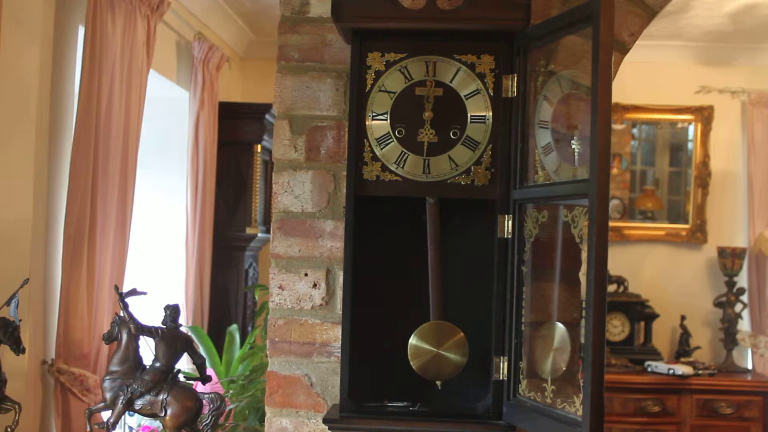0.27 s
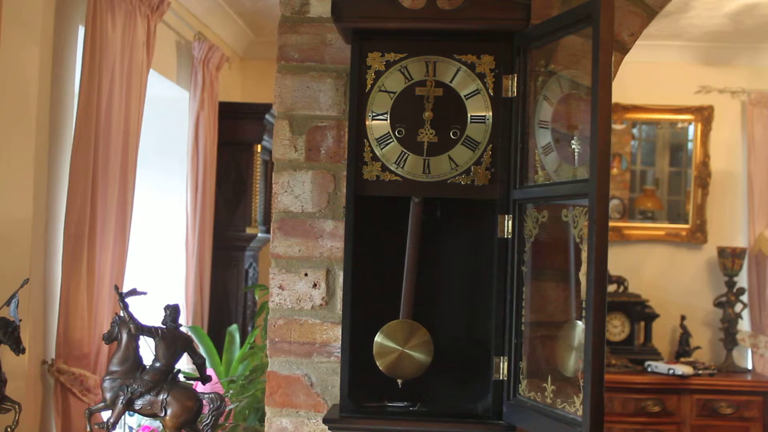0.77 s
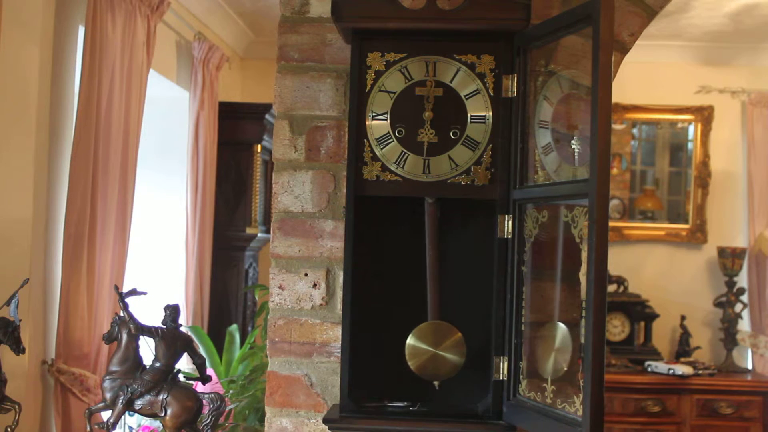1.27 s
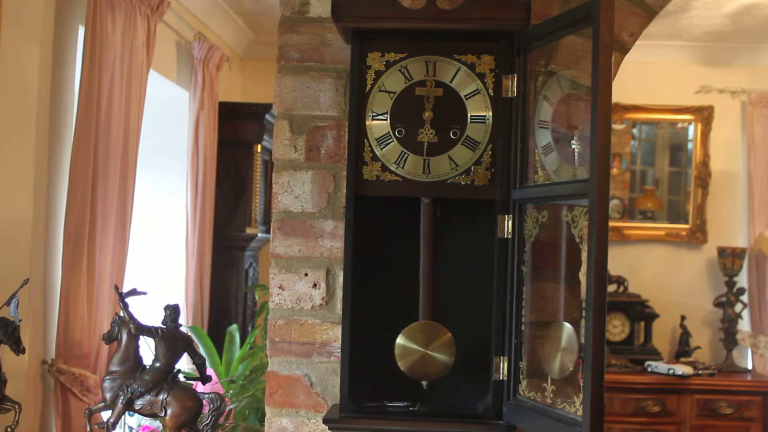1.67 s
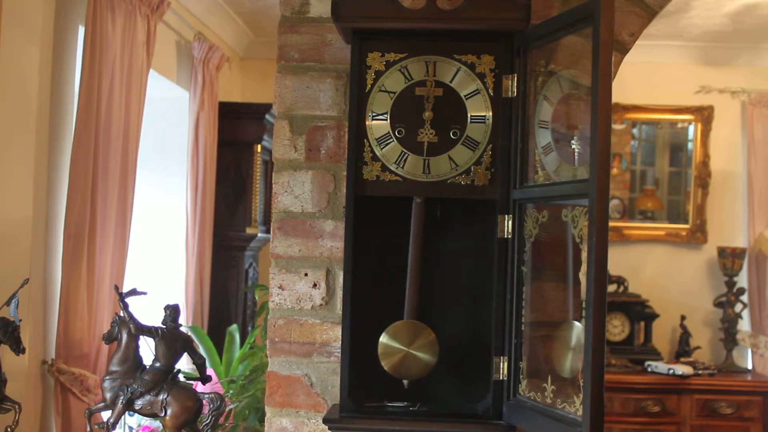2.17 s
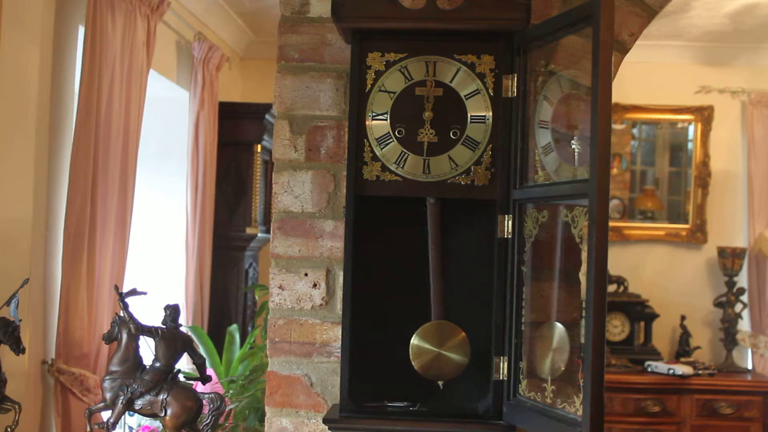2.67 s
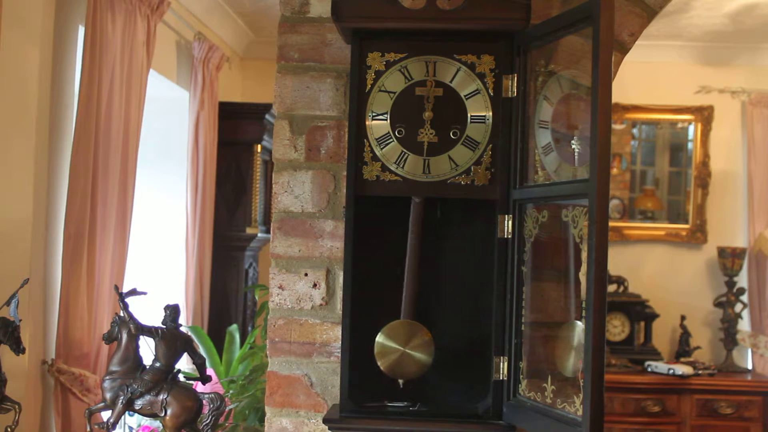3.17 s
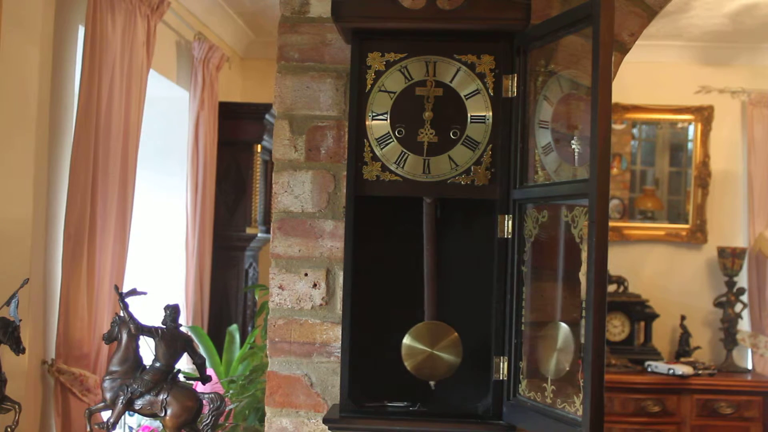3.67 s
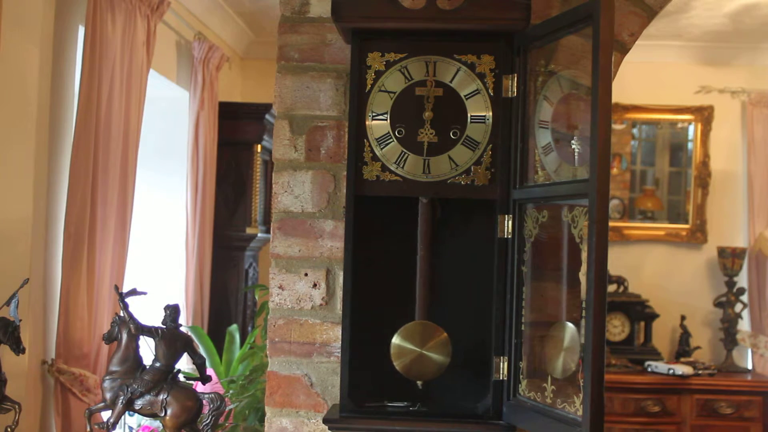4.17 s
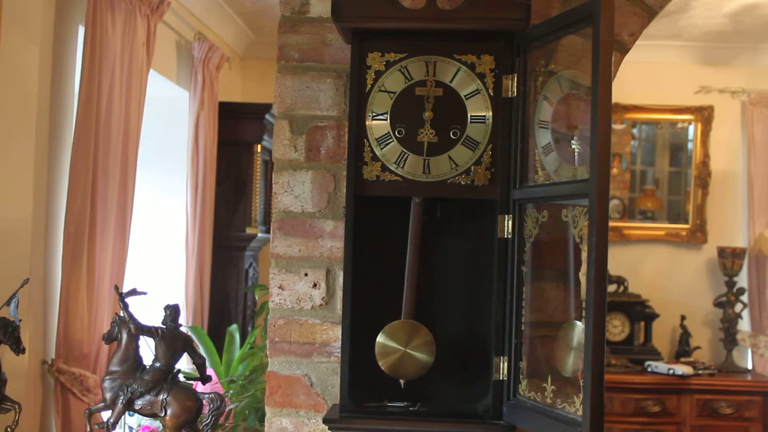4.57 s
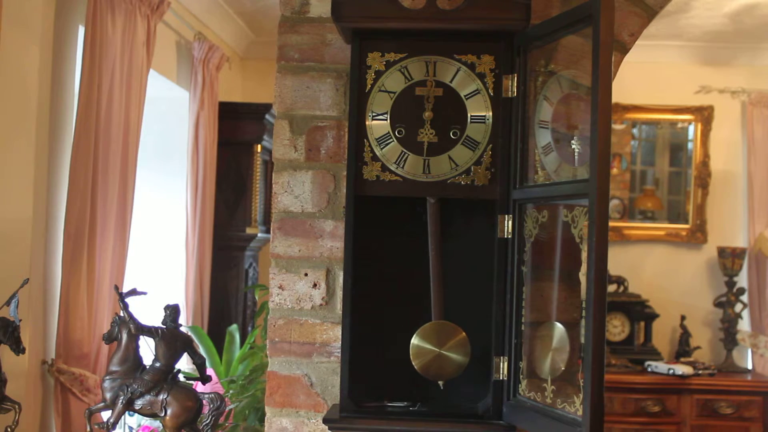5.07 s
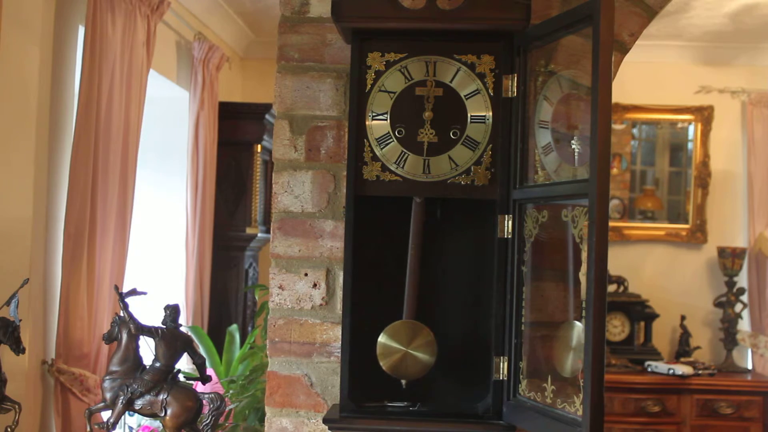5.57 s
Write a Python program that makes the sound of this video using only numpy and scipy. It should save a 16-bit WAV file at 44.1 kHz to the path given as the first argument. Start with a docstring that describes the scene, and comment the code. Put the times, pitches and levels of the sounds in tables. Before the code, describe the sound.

Close to an open pendulum wall clock in a quiet living room, a gong stroke is already ringing. Four more blows follow a little over a second apart, each a woody thud with a bright steely ping and long wavering ring. The hammer clacks back just after each one, a thin rattling whirr runs between strokes, and small clicks stop it. Faint room hum lies beneath.

```python
"""In a quiet living room a wall clock, its case door open, strikes the hour on a coiled wire gong.
Each hammer blow adds to the ring that is still there, so single partials swell or cancel from stroke to stroke.
Blows thud in the wooden case as damped modes and noise; the hammer clacks back on its rest.
Between strokes the fly of the strike train whirrs, a chopped noise, until lifting the hammer slows it.
The works click softly as short noise resonances, over faint air noise and a hum of steady sines."""
import sys
import numpy as np
from scipy import signal
from scipy.fft import rfft, irfft
from scipy.io import wavfile

SR = 44100
rng = np.random.default_rng(int(sys.argv[2]) if len(sys.argv) > 2 else 0)


def materialize(psi):
    """Save the field psi as 16-bit PCM at rate SR to the path in sys.argv[1].

    A 1-D psi becomes a single channel; in a 2-D psi each row is a channel.
    """
    bounded = np.clip(np.atleast_2d(psi).T, -1, 1)
    quanta = np.round(bounded * 32767).astype(np.int16)
    wavfile.write(sys.argv[1], SR, quanta)


N = 256220
T = np.arange(N) / SR  # seconds

# Air noise of the room. Each row: frequency in Hz, density in dB per Hz.
ROOM_AIR = [(25, -87), (70, -89), (130, -83), (330, -78), (1000, -83), (2200, -83), (4500, -89),
            (6500, -97), (10000, -96), (13000, -98), (15500, -103)]
# Steady hum in the room. Each row: frequency in Hz, rms level in dB.
ROOM_HUM = [(50, -72), (100, -62.5), (140, -65), (200, -60.5), (286, -59.5), (353, -58.5)]
# Hammer blows on the gong; the first falls before the sound opens, so only its ring is heard.
# Each row: time in seconds, strength in dB, brightness in dB per octave from 1 to 5 kHz.
STROKES = [ (-0.28889, -.5, 0), (0.997214, -.3, 0), (2.224, .1, .5), (3.469526, -1.4, -.1),
           (4.791204, .2, -.2), ]
# Bending modes of the coil.
# Each row: frequency in Hz, level in dB before family gain and blow strength, t60 in seconds.
BENDING_MODES = [(177.54, -54.4, 22.0), (227.2, -42.9, 19.6), (428.66, -37.8, 13.8), (509.7, -27.8, 8.7),
                 (596.66, -24.8, 6.1), (689.44, -32.5, 8.7), (787.0, -34.8, 6.1), (891.52, -31.5, 6.1),
                 (1001.04, -17.6, 6.1), (1114.98, -24.1, 9.7), (1236.32, -27.9, 6.1), (1360.42, -30.8, 5.4),
                 (1491.52, -26.2, 4.8), (1626.84, -32.7, 9.7), (1765.8, -47.6, 10.9), (1908.64, -38.2, 5.4),
                 (2052.9, -41.1, 10.9), (2200.26, -35.6, 10.9), (2348.18, -39.2, 6.9),
                 (2499.12, -35.7, 6.9), (2655.82, -36.7, 7.7), (2819.36, -40.6, 6.9), (2992.94, -39.6, 6.9),
                 (3171.92, -36.7, 4.8), (3359.56, -27.7, 3.0), (3553.04, -31.4, 2.1), (3751.0, -31.9, 2.7),
                 (3955.74, -33.5, 1.7)]
# Mostly weaker modes in the plane of the coil, most lying a little below a bending mode.
# Each row: frequency in Hz, level in dB before family gain and blow strength, t60 in seconds.
IN_PLANE_MODES = [(873.14, -48.2, 19.6), (980.9, -41.8, 8.7), (1093.48, -44.1, 17.4),
                  (1214.02, -45.7, 10.9), (1335.82, -36.9, 6.9), (1599.26, -45.0, 6.9),
                  (1736.38, -44.5, 4.8), (1876.3, -48.9, 10.9), (2017.52, -49.6, 6.9),
                  (2160.94, -49.8, 8.7), (2307.2, -37.8, 2.7), (2457.6, -34.2, 1.7), (2615.14, -43.4, 3.0),
                  (4124.44, -46.9, 4.3), (4783.32, -49.2, 4.8), (2786.14, -51.8, 5.4),
                  (2955.9, -56.9, 22.0), (3710.56, -47.7, 3.8), (3907.1, -50.0, 3.4), (5243.9, -51.6, 4.3),
                  (5722.48, -51.8, 3.0)]
# Short high modes that make the steely ping.
# Each row: frequency in Hz, level in dB before family gain and blow strength, t60 in seconds.
PING_MODES = [(4167.2,-22.5,1.8), (4382.4,-30,1.6), (4604.22,-30.5,.95), (4830.58,-33.5,1.1),
              (5059.9,-33.5,2), (5294.8,-43,2.3), (5534.7,-37,2.3), (5777.0,-51,2), (6022.38,-43,2.3),
              (6269.88,-46,2.6), (6764.38,-44.5,1.8), (8957,-56,1.6), (9265.34,-52.5,2.6), (10213.2,-51,.7),
              (10539.7,-44,.4), (10871,-55,.6), (11202,-54,.4), (11550.7,-53,1.8), (11886,-54,.8),
              (12233.2,-50,1), (12578,-49,.7), (12927,-54,.8), (13280,-48,1.2), (13638,-55,1.3),
              (13996,-53,1), (14362,-54,.8), (15105,-52,.7), (15493.3,-54,1.1)]
# Damped modes of the wooden case.
# Each row: frequency in Hz, level in dB before family gain and blow strength, t60 in seconds.
CASE_MODES = [(200,-42,.25), (470,-33,.14), (600,-32,.12), (880,-20,.09), (955,-25,.08), (1325,-20,.08),
              (1465,-27,.08)]
# Noise of a blow on the case. Each row: frequency in Hz, density in dB per Hz before the blow's envelope.
KNOCK_NOISE = [(80, -88), (200, -63), (450, -59), (900, -55), (1350, -55), (2000, -67), (4500, -69),
               (7500, -80), (11000, -85), (15000, -87)]
# Clack of the hammer on its rest. Each row: frequency in Hz, density in dB per Hz before its envelope.
REST_NOISE = [(80, -95), (200, -68), (500, -59), (1400, -53), (2500, -67), (4500, -72), (7000, -81),
              (9000, -79), (15000, -85)]
# The hammer falls back on its rest. Each row: time in seconds, relative level in dB, pitch in Hz.
REBOUNDS = [(1.066, 0, 1750), (2.285, 0, 2040), (3.547, 1.5, 2050), (4.878, -1, 1800)]
# Tone of the strike train's whirr. Each row: frequency in Hz, density in dB per Hz before the run level.
WHIRR_TONE = [(300, -47.5), (1000, -39), (2500, -36), (3600, -40.5), (4500, -35.5), (5600, -39),
              (6800, -46), (9000, -44), (12000, -41.5), (12950, -38), (13370, -23), (13750, -31),
              (14100, -41), (15600, -46)]
# Runs of the fly, one for each stroke. Each row: start in seconds, length in seconds,
# top gain in dB, final part spent lifting the hammer in seconds.
FLY_RUNS = [(-.28, .78, -40.5, .32), (.975, .755, -38.5, .34), (2.195, .655, -38, .22),
            (3.60, .52, -43.5, .22), (4.92, .52, -41.5, .13)]
# Light clicks of escapement and levers.
# Each row: time in seconds, starting level of the narrow ring in dB, pitch in Hz.
CLICKS = [(.66, -55, 13500), (.765, -53, 4600), (1.845, -53, 10500), (1.90, -51, 4500), (3.12, -53, 5300),
          (3.18, -54, 14200), (4.345, -52, 5200), (4.64, -53, 7300), (4.675, -55, 14200),
          (5.652, -48, 13200)]

FLY_HZ = 61.4  # mean turns per second, around which the speed drifts
SPIN_UP_S, SPEEDING_DB_PER_S = .04, 13  # the whirr sets in, then swells as the fly gathers speed
LOAD_DB, STOP_T60_S = 10, .3  # lifting the hammer drags the whirr down; then it dies away
CATCH_DB, CATCH_HZ = -50, 13400  # small click that ends each run
TOP_HZ = 15750


def undb(db):
    """Decibels to gain."""
    return 10 ** (np.asarray(db) / 20)


def fade(at, t60):
    """Exponential decay that starts at a given moment."""
    return (T >= at) * np.exp(-np.log(1000) * np.maximum(T - at, 0) / t60)


def colour(x, spectrum):
    """Give white sound of rms 1 a density in dB per Hz, drawn over log frequency."""
    hz, db = np.transpose(spectrum)
    bins = np.maximum(np.fft.rfftfreq(N, 1 / SR), 1)
    gain = undb(np.interp(np.log(bins), np.log(hz), db))
    return irfft(rfft(x) * gain, N) * np.sqrt(SR / 2)


def noise(spectrum):
    """Noise with the given density in dB per Hz."""
    return colour(rng.standard_normal(N), spectrum)


def resonance(hz, width_hz):
    """Noise in one resonance, rms 1."""
    centre_hz = min(hz, SR / 2 - width_hz)
    b, a = signal.iirpeak(centre_hz, hz / width_hz, fs=SR)
    y = signal.lfilter(b, a, rng.standard_normal(N))
    return y / y.std()


def room():
    """Faint air noise and a low hum."""
    hum = sum(undb(db) * np.sin(2 * np.pi * (hz * T + rng.random())) for hz, db in ROOM_HUM)
    return noise(ROOM_AIR) + np.sqrt(2) * hum


def ring(modes, gain_db, rise_s):
    """Modes kicked by every blow on top of what they still hold; each kick builds up over rise_s."""
    out = np.zeros(N)
    starts = [max(int(np.ceil(row[0] * SR)), 0) for row in STROKES] + [N]
    age = np.arange(max(np.diff(starts))) / SR
    for (hz, db, t60), turn in zip(modes, rng.random(len(modes))):
        pole = 2j * np.pi * hz - np.log(1000) / t60
        wave = np.exp(pole * age)
        held = 0  # complex state: strength and phase still ringing
        octaves = np.log2(np.clip(hz, 1000, 5000) / 1000)
        for (at, blow_db, bright_db), a, b in zip(STROKES, starts, starts[1:]):
            strength = undb(db + blow_db + bright_db * octaves)
            # a blow before the opening has already decayed and turned by then
            kick = strength * np.exp(pole * (a / SR - at) + 2j * np.pi * turn)
            arrived = np.minimum((T[a:b] - at) / rise_s, 1)
            out[a:b] += ((held + kick * arrived) * wave[:b - a]).imag
            held = (held + kick) * np.exp(pole * (b - a) / SR)
    return np.sqrt(2) * undb(gain_db) * out


def gong():
    """Three families of modes of the coiled wire; each kick builds up as it runs along the wire."""
    bending = ring(BENDING_MODES, gain_db=-2.5, rise_s=.007)
    in_plane = ring(IN_PLANE_MODES, gain_db=-2, rise_s=.012)
    ping = ring(PING_MODES, gain_db=-1, rise_s=.011)
    return bending + in_plane + ping


def soft_burst(at, t60, rise_t60, room_db, room_t60=.6):
    """A rounded onset and short decay, with a quieter, longer room tail."""
    return fade(at, t60) - fade(at, rise_t60) + undb(room_db) * fade(at, room_t60)


def hammer(ring_db=-25):
    """Each blow thuds in the wooden case; the hammer then drops back on its rest with a short clack."""
    knocks = sum(undb(db) * soft_burst(at, t60=.2, rise_t60=.02, room_db=-17) for at, db, _ in STROKES)
    thuds = ring(CASE_MODES, gain_db=.5, rise_s=.007) + knocks * noise(KNOCK_NOISE)
    rest = noise(REST_NOISE)
    clacks = 0
    for at, db, hz in REBOUNDS:
        shape = soft_burst(at, t60=.085, rise_t60=.015, room_db=-18)
        clacks += undb(db) * shape * (rest + undb(ring_db) * resonance(hz, width_hz=110))
    return thuds + clacks


def whirr_level():
    """Each run of the fly sets in, swells, sags under the weight of the hammer and dies away."""
    out = np.zeros(N)
    for start, length, db, lifting in FLY_RUNS:
        stop = start + length
        speeding_db = SPEEDING_DB_PER_S * np.minimum(T - (stop - lifting), 0)
        load_db = LOAD_DB * np.clip(1 + (T - stop) / lifting, 0, 1)
        spin_up = np.clip((T - start) / SPIN_UP_S, 0, 1)
        die_away = np.where(T < stop, 1, fade(stop, STOP_T60_S))
        out += spin_up * die_away * undb(db + speeding_db - load_db)
    return out


def body(x, t60, ring_db):
    """The case and gong ring briefly in many close modes, as a decaying noise tail."""
    tail = (rng.standard_normal(N) * fade(0, t60))[:SR // 4]
    wet = signal.fftconvolve(x, tail / np.sqrt(np.sum(tail ** 2)))[:N]
    return (x + undb(ring_db) * wet) / np.hypot(1, undb(ring_db))


def fly(rattle_s=.004, smooth=.28, scatter_db=1, tooth_depth=.6):
    """The air brake rattles once a turn, and its pinion leaves chop the rattle five times a turn."""
    drift = np.interp(T, np.linspace(0, T[-1], 24), rng.standard_normal(24))
    turns = np.cumsum(FLY_HZ * (1 + .008 * drift)) / SR
    size = undb(scatter_db * rng.standard_normal(N)[turns.astype(int)])  # one size per turn
    leaves = np.cos(2 * np.pi * 5 * turns)
    bursts = size * np.exp(-(turns % 1) / FLY_HZ / rattle_s)
    rattle = (smooth + bursts) * (1 + tooth_depth * leaves)
    rattle /= np.sqrt(np.mean(rattle ** 2))
    contacts = rng.standard_normal(N) * rattle * whirr_level()
    return colour(body(contacts, t60=.12, ring_db=-3), WHIRR_TONE)


def works(click_t60=.16, broad_db=-5):
    """Small brass parts touch, now and then and at the end of each run: a narrow ring over a broad tick."""
    tick = undb(broad_db) * resonance(5500, width_hz=5000)
    catches = [(start + length, CATCH_DB, CATCH_HZ) for start, length, _, _ in FLY_RUNS]
    out = np.zeros(N)
    for at, db, hz in list(CLICKS) + catches:
        out += undb(db) * fade(at, click_t60) * (resonance(hz, width_hz=600) + tick)
    return out


def scene():
    """The clock close by, in its room."""
    return (room() + gong() + hammer() + fly() + works())[None]


def record(dry):
    """The recorder cuts the top with a steep low-pass."""
    low_pass = signal.ellip(10, .2, 80, TOP_HZ, fs=SR, output="sos")  # .2 dB ripple, 80 dB down
    return signal.sosfilt(low_pass, dry)


dry = scene()
out = record(dry)
materialize(out)
```